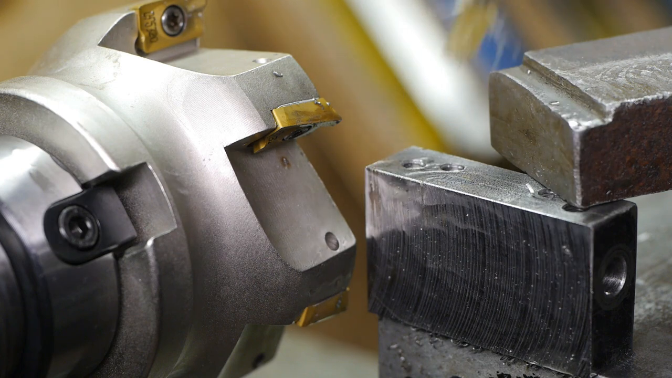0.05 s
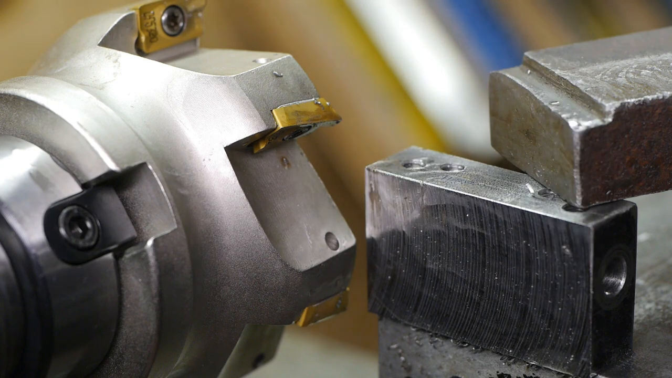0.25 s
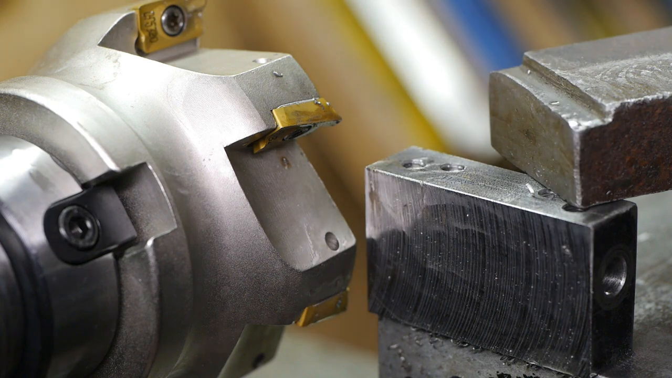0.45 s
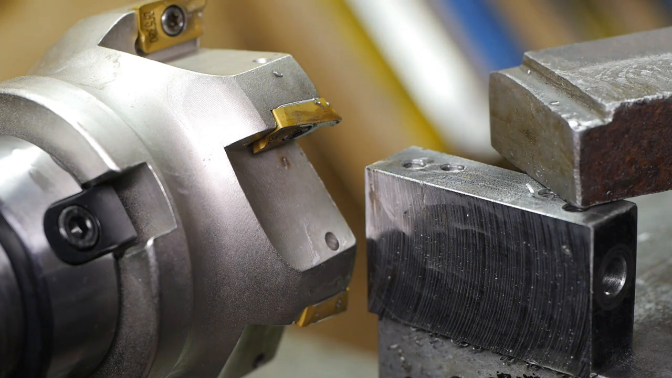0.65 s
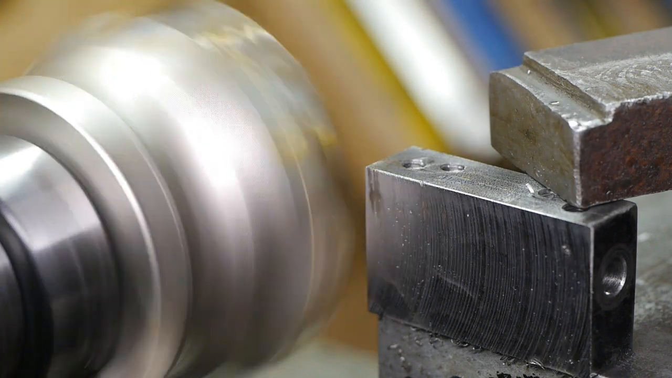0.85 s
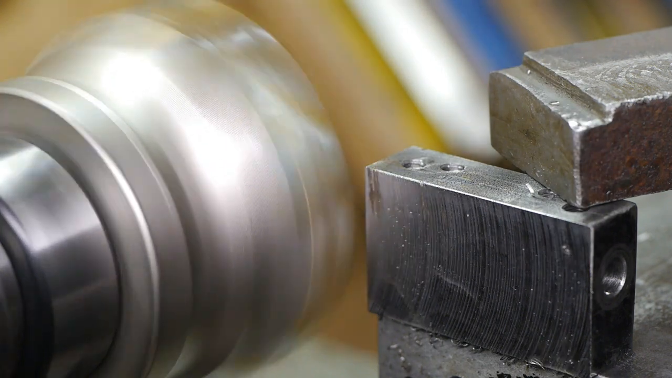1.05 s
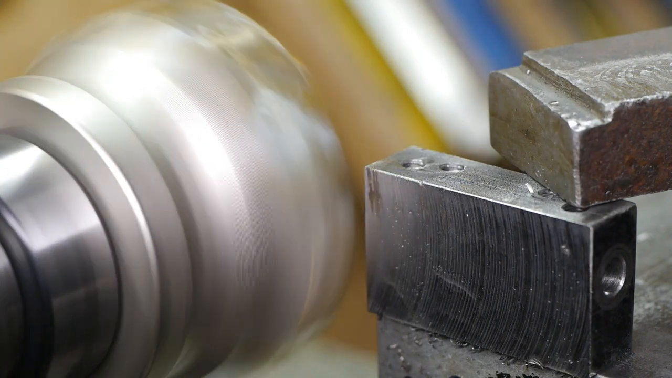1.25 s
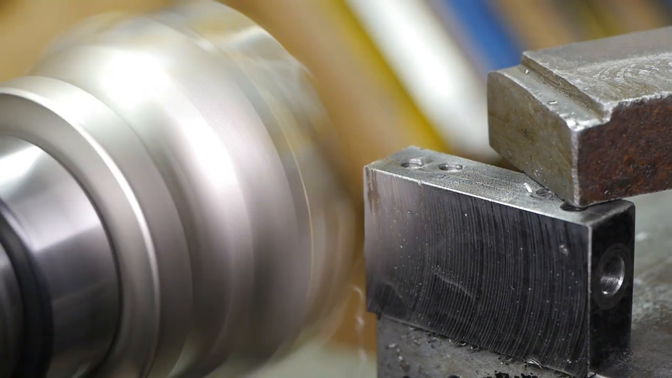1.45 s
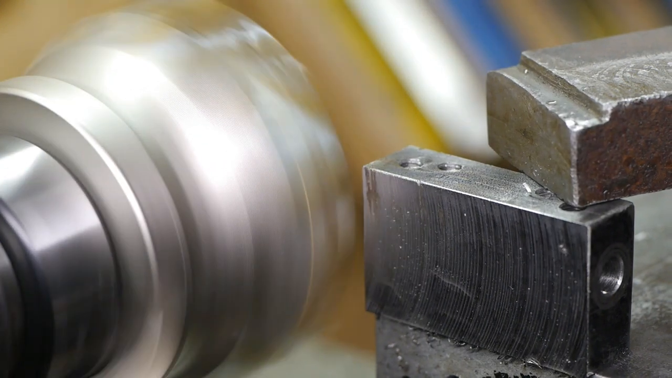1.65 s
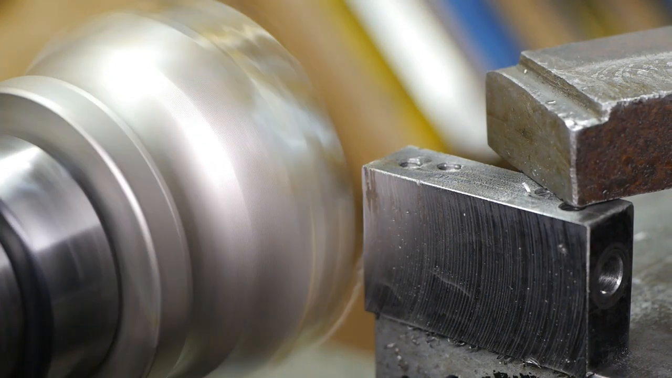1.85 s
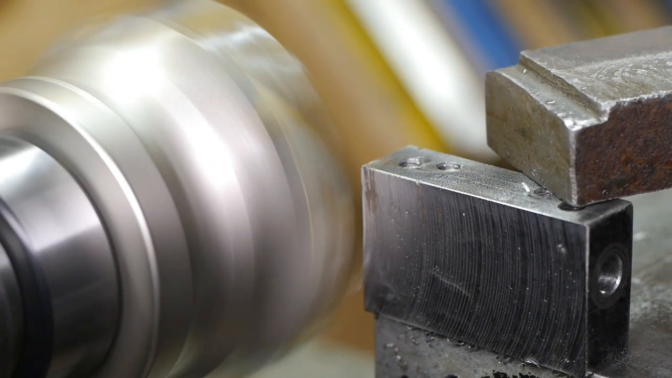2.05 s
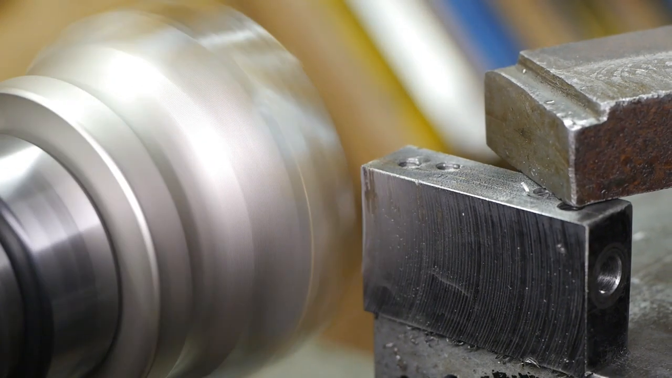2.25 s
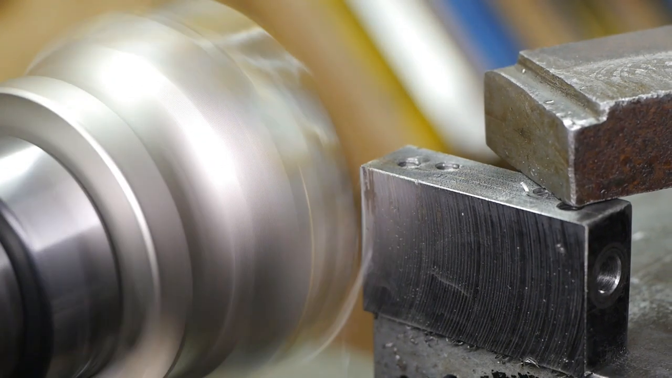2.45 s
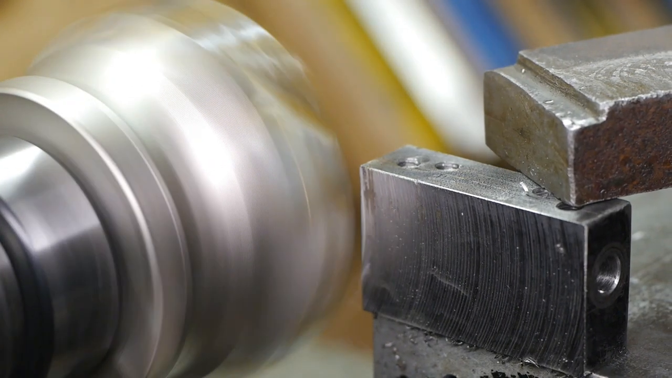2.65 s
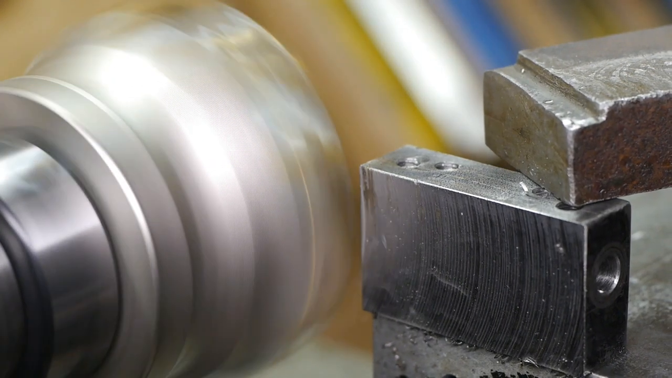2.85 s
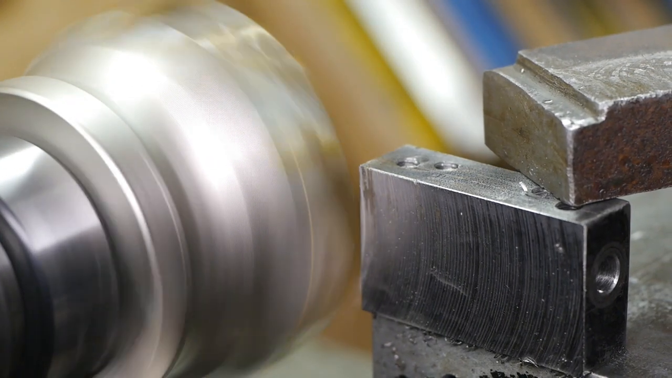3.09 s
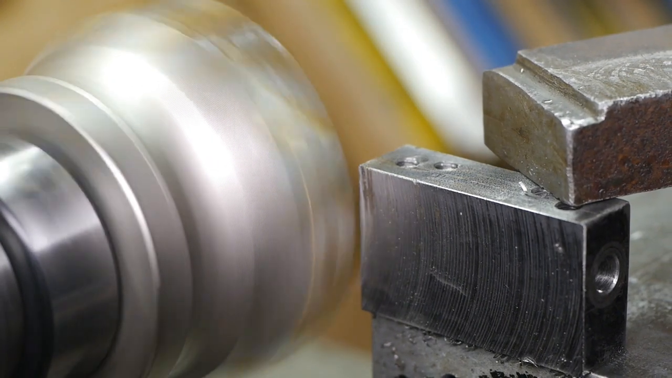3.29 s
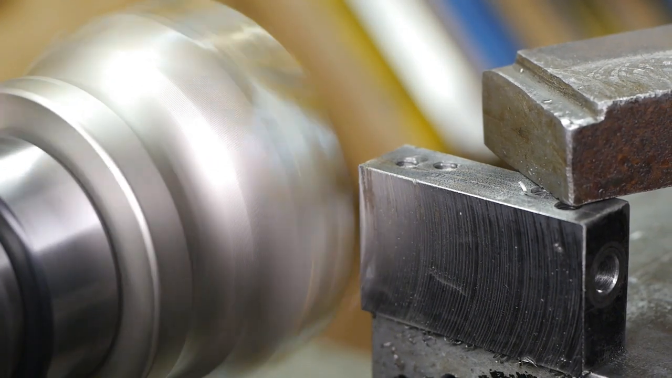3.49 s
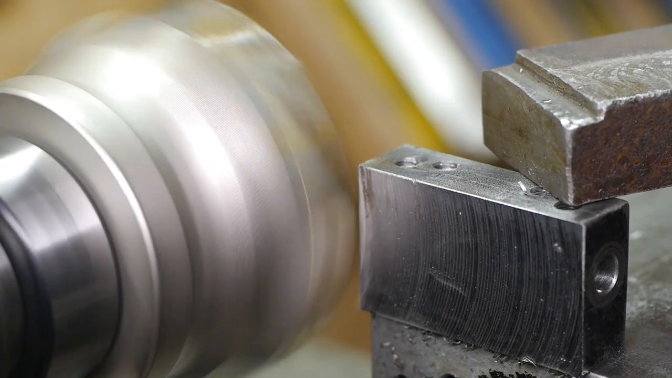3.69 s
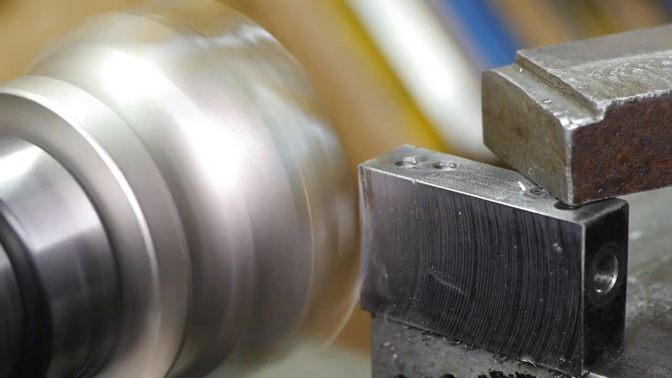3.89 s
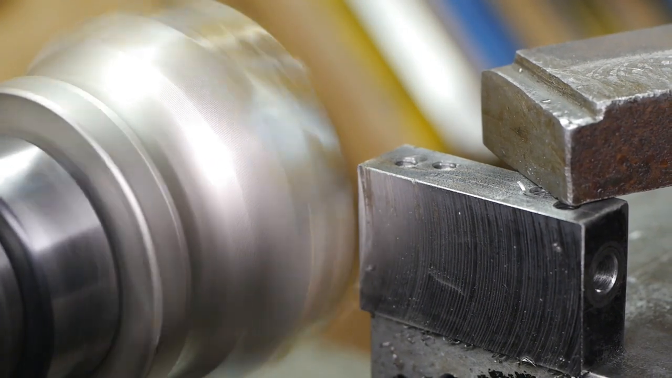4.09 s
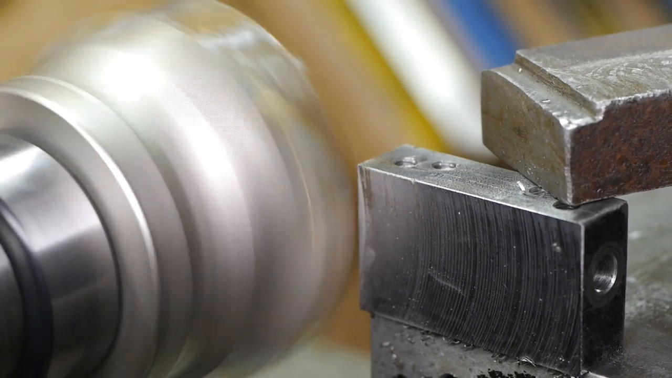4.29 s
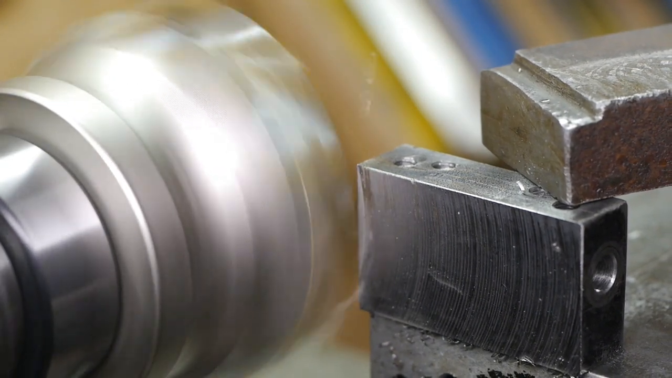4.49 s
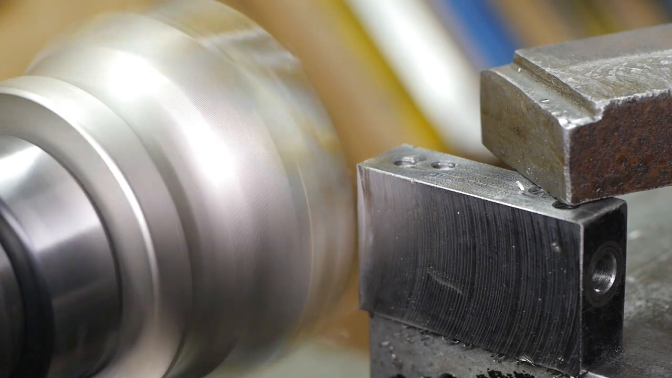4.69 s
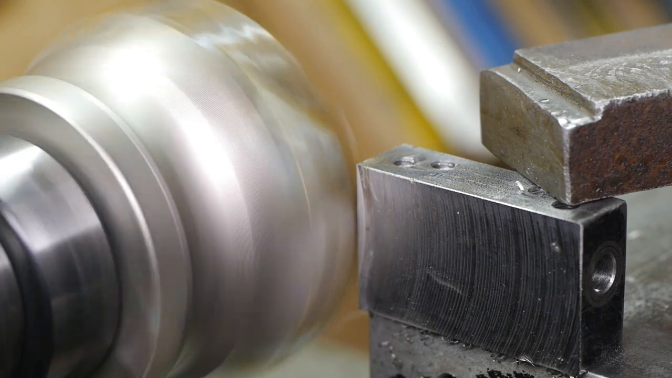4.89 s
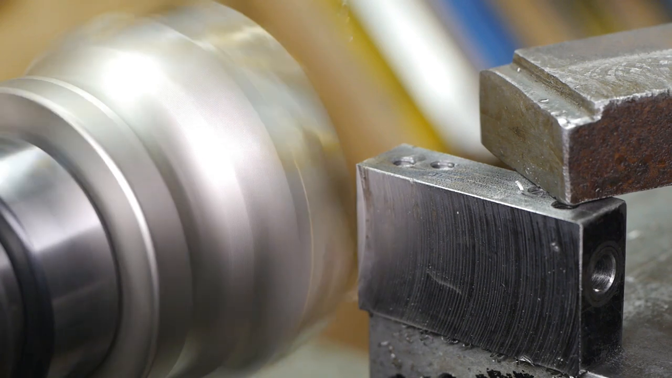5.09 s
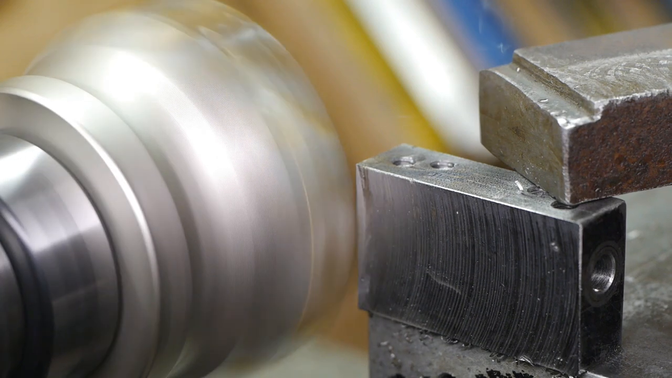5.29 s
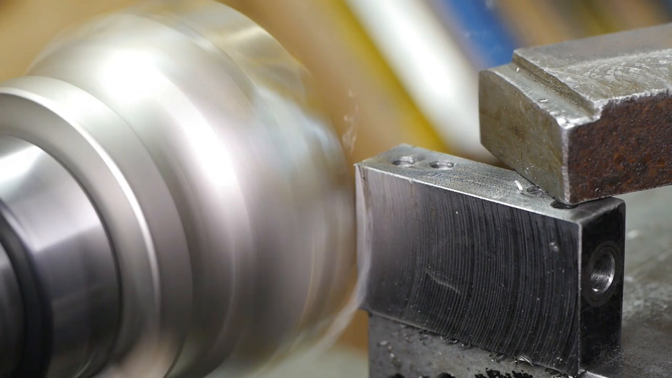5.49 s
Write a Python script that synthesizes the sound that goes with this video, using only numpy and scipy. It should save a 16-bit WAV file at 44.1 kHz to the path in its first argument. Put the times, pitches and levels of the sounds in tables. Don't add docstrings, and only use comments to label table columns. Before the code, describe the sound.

Quiet shop hum and a short brush stroke give way to a spinning milling cutter, whining electrically, thumping and chirping about seven times a second.

```python
import sys
import numpy as np
from scipy import signal
from scipy.fft import rfft, irfft, next_fast_len
from scipy.io import wavfile
from scipy.ndimage import uniform_filter1d, map_coordinates

SR = 44100
rng = np.random.default_rng(int(sys.argv[2]) if len(sys.argv) > 2 else 0)


def convert_level_to_amplitude(level_db):
    exponent = np.asarray(level_db, float) / 20
    return 10 ** exponent


def waveform_to_disk(signal):
    frames = np.transpose(np.atleast_2d(signal))
    scaled = np.clip(frames, -1, 1) * 32767
    samples = np.round(scaled).astype(np.int16)
    wavfile.write(sys.argv[1], SR, samples)


N = 243873

TURN_HZ = 6.917
SWITCH_HZ, TOOTH_HZ, SUPPLY_HZ = 1999.94, 224.745, 82.48
SLOT_HZ, ROTOR_HZ = 876.15, 13.6


def unit(x):
    return x / np.sqrt(np.mean(x ** 2) + 1e-20)


def along(points, hz):
    f, v = np.transpose(points)
    return np.interp(np.log(hz + 1), np.log(f + 1), v)


def curves(rows):
    s, *cols = np.transpose(rows)
    t = np.arange(N) / SR
    return [np.interp(t, s, c, left=-150, right=c[-1] if s[-1] > 5 else -150) for c in cols]


def wobble(rate):
    return map_coordinates(rng.standard_normal(int(N * rate / SR) + 4), [np.arange(N) * rate / SR])


def filtered(x, response):
    m = next_fast_len(N + SR // 2)
    return irfft(rfft(x, m) * response(np.fft.rfftfreq(m, 1 / SR)), m)[..., :N]


def ring(hz, width):
    return lambda f: 1j * f * width / (hz * hz - f * f + 1j * f * width)


def rush(spectrum, alike, patchy_db):
    z = signal.stft(rng.standard_normal((2, N)), nperseg=512)[2]
    field = uniform_filter1d(rng.standard_normal(z.shape[1:]), size=5, axis=0)
    field = uniform_filter1d(field, size=8, axis=1)
    pair = signal.istft(z * convert_level_to_amplitude(patchy_db * unit(field)), nperseg=512)[1][:, :N]
    turn = lambda hz: np.arccos(np.clip(along(alike, hz), -1, 1)) / 2
    mid, side = filtered(pair, lambda hz: convert_level_to_amplitude(along(spectrum, hz)) * [np.cos(turn(hz)), np.sin(turn(hz))])
    return unit(np.array([mid + side, mid - side]))


def place(db, pan_db, lag):
    share = 1 / (1 + convert_level_to_amplitude(-pan_db) ** 2)
    return convert_level_to_amplitude(db) * np.sqrt([[share], [1 - share]]) * np.exp(1j * lag / 2 * np.array([[-1], [1]]))


# centre in Hz, width in Hz, depth 0-1.
PATH_DIPS = [(2340, 120, 0.26), (3050, 110, .75), (3740, 110, 0.02), (5200, 200, 0.2), (5460, 160, 0.35),
             (9020, 580, 1), (11100, 400, 0.5), (12000, 300, .35)]


def path(f):
    return np.prod([1 - np.clip(depth, 0, 1) * ring(hz, width)(f) for hz, width, depth in PATH_DIPS], axis=0)


# time in seconds, rustle level in dB.
STIR = [
    (0, -67.5),
    (.25, -62),
    (.37, -57),
    (.46, -57.5),
    (.52, -53.5),
    (.6, -59.5),
    (.7, -59),
    (.905, -67),
    (.912, -72),
]
# pitch in Hz, level in dB rms.
HUM_LINES = [(92.2, -66.5), (100.3, -72), (46.4, -74)]
# frequency in Hz, level in dB per Hz.
HUM = [(20, -27), (45, -16), (84, -18), (96, -12), (108, -12), (140, -14), (190, -56)]
RUSTLE = [(120, -38), (200, -8.5), (255, -5.5), (300, -1), (360, -6), (450, -4.5), (560, -9.5),
          (800, -10.5), (1000, -15), (1090, -6.5), (1200, -19), (1500, -17), (2500, -48)]
STILL_AIR = [(700, -11), (1200, -4.5), (2000, -6.5), (5000, -11), (9000, -12), (13000, -17.5), (14500, -24),
             (15700, -15)]
# frequency in Hz, left-right likeness.
SHOP_ALIKE = [(60, 0.75), (180, 0.96), (550, 0.55), (1650, -0.72), (4970, 0.067), (15000, 0.25)]


def shop():
    stir_db, = curves(STIR)
    on = stir_db > -100
    hum = on * convert_level_to_amplitude(-69 + .6 * wobble(7.4)) * rush(HUM, SHOP_ALIKE, patchy_db=3.0)
    beat = 2 * np.pi * (np.arange(N) / SR - 0.32)
    for hz, db in HUM_LINES:
        hum = hum + on * np.sqrt(2) * convert_level_to_amplitude(db + 1.2 * wobble(6)) * np.sin(hz * beat)
    rustle = convert_level_to_amplitude(stir_db + 0.52 * wobble(23.0)) * rush(RUSTLE, SHOP_ALIKE, patchy_db=1.5)
    air_db = -60 + .35 * (stir_db + 59.5)
    return hum + rustle + on * convert_level_to_amplitude(air_db) * rush(STILL_AIR, SHOP_ALIKE, patchy_db=0.5)


# time of the peak in seconds, peak in dB, rise and fall in seconds,
# centre in Hz.
STROKES = [
    (0.049, -43.5, 0.018, .01, 10500),
    (.502, -57, .003, 0.027, 5100),
    (.529, -44.5, .0008, 0.036, 5300),
    (.544, -40.5, 0.012, .015, 6400),
    (.3725, -50, .0004, .008, 730),
    (.04, -62, 0.024, 0.018, 2600),
]
KNOCKS = [
    (.528, -46.5, 0.0016, 0.036, 2600),
    (.55, -50, 0.012, .02, 140),
    (.525, -52, .005, .017, 950),
    (.3728, -48, .0003, .0022, 860),
]
# pitch in Hz, width in Hz, level in dB.
HANDLE = [(2135, 44, -4), (2700, 150, -6), (3280, 72, -8), (3610, 40, -10), (4020, 46, -4), (4950, 56, -8),
          (5400, 82, -12), (5800, 61, -10), (6910, 46, -15), (7500, 49, -9)]
# start in seconds, level in dB.
TICKS = [
    (.4995, -60),
    (.5038, -64),
    (.5275, -49),
    (.534, -54),
    (.541, -53),
    (.5455, -52),
    (.551, -56),
    (.556, -60),
]
# pitch in Hz, level in dB, 60 dB decay in seconds.
FERRULE = [(2137, -9, .25), (2740, -2, .12), (3311, -7, 0.15), (3640, -7, .12), (4150, -4.5, .12),
           (5066, -4, .1), (5421, -8, .1), (5862, -6, .08), (6751, -8, .08), (7350, -4, .08)]


def brush():
    t, out = np.arange(SR) / SR, np.zeros((2, N))
    puffs = [(*row, 1) for row in STROKES] + [(*row, 0.53) for row in KNOCKS]
    for s, db, rise, fall, hz, octaves in puffs:
        swell = np.exp(np.minimum((t - s) / abs(rise), (s - t) / abs(fall)))
        bristles = rng.standard_normal((3, SR)) * convert_level_to_amplitude(1.3 * wobble(600)[:SR])
        colour = np.exp(-(np.log2((np.fft.rfftfreq(SR, 1 / SR) + 1) / hz) / octaves) ** 2)
        grain = unit(irfft(rfft(bristles[0] + 0.5 * bristles[1:]) * colour, SR))
        out[:, :SR] += convert_level_to_amplitude(db - 3.0) * swell * grain
    body = lambda f: 1 + 3.5 * sum(convert_level_to_amplitude(db) * ring(hz, .7 * width)(f) for hz, width, db in HANDLE)
    out, t = filtered(out, body), t[:SR // 4]
    for s, db in TICKS:
        bell = 0
        for hz, level, t60 in FERRULE:
            a, b = rng.standard_normal(2)
            bell = bell + convert_level_to_amplitude(level + 3.9 * a - 60 * t / t60) * np.sin(2 * np.pi * hz * (1 + .004 * b) * t)
        out[:, round(s * SR):][:, :len(t)] += convert_level_to_amplitude(db) * bell
    return out


# switching multiple, tooth multiple, level in dB rms, left minus right in dB,
# left lag in radians.
TONES = [(0, 2, -51.0, -1.0, -0.1), (0, 5, -25.0, 4.0, -0.8), (1, -3, -51.0, 4.0, -0.6),
         (1, -2, -52.0, 9.0, 0.1), (0, 7, -48.0, 3.0, -0.1), (1, 0, -40.0, 9.0, -0.6),
         (2, -7, -57.0, 8.0, 0.6), (1, 2, -43.0, 14.0, 0.1), (0, 12, -47.0, 3.0, 0.0),
         (2, -5, -52.0, -2.0, -0.9), (1, 5, -48.0, 1.0, -0.5), (3, -12, -54.0, 7.0, 0.3),
         (2, -3, -50.0, 3.0, 0.5), (2, -2, -51.0, -2.0, -0.0), (1, 7, -52.0, 5.0, -0.0),
         (2, 0, -41.0, 0.0, 0.4), (3, -7, -52.0, 5.0, -0.6), (2, 2, -37.0, 1.0, 0.4),
         (1, 12, -50.0, -7.0, -0.7), (3, -5, -52.0, 8.0, -0.7), (3, -3, -51.0, 12.0, 0.5),
         (2, 8, -55.0, 8.0, 0.3), (3, 2, -54.0, -1.0, -0.1), (2, 15, -59.0, -1.0, 0.1)]
# switching, tooth and supply multiples, level in dB rms,
# left minus right in dB.
BEATS = [(1, -5, -1, -55.0, 1.0), (1, -5, 1, -49.0, 0.0), (0, 4, 1, -48.0, 2.0), (0, 5, -1, -56.0, -4.0),
         (0, 5, 1, -42.0, 4.0), (0, 5, 2, -57.0, 1.0), (0, 6, 1, -54.0, -2.0), (1, -2, -1, -46.0, 0.0),
         (0, 7, -1, -53.0, 0.0), (1, 0, -1, -58.0, 11.0), (1, 0, 1, -60.0, 8.0), (1, 2, 1, -57.0, 7.0),
         (1, 7, 1, -52.0, 3.0), (2, 0, -3, -57.0, -4.0), (2, 0, 1, -60.0, 2.0), (2, 2, 1, -59.0, 5.0),
         (1, 12, 1, -49.0, 3.0), (3, -3, 1, -59.0, -1.0), (3, 12, 3, -61.0, 4.0), (3, 15, 1, -60.0, 9.0),
         (6, -10, -2, -55.0, 7.0), (3, 15, 3, -60.0, 5.0), (4, 10, 3, -60.0, -1.0), (4, 15, 3, -60.0, -5.0)]
# rotor turns off the line, level in dB rms.
WHINE = [(-2, -49), (-1, -46), (.5, -57), (1, -47)]
# pitch in Hz, level in dB rms, left minus right in dB, left
STRAY = [(435.4, -56, 0, -.1), (505.4, -50, 0, -.1), (532, -57, 0, 0), (674.2, -56, -1, 0),
         (4612.8, -57, -3, .4), (4860.4, -49, 6, .3), (8201.8, -57, 2, .1), (9422.1, -62, 12, -.7),
         (9669.6, -60, 7, -.6), (10577, -61, 1, -.6), (11535.7, -62, -3, -1.2), (2026.8, -56, 6, -.5),
         (2247.5, -63, 3, 0), (3108.9, -58, 0, -.5), (3407.6, -59, 3, .3), (3466.8, -59, -1, 0),
         (4164, -59, 3, 0), (4285.1, -58, 1, .3), (4793.8, -57, 0, -.5), (5371.9, -70, 3, 0),
         (6629.5, -67, 1, 0), (6920.2, -61, 3, 0), (7326.7, -60, 1, 0), (8494.8, -61, -1, 0),
         (8629.4, -63, -1, 0), (9797.6, -69, -3, 0), (10045.2, -62, -5, -.4), (11423.4, -64, -2, -1)]
TEETH = (0, 2, 3, 5, 7, 8, 10, 12, 15)
# frequency in Hz, level in dB rms.
FAINT = [(1000, -54), (2500, -66.5), (4000, -66), (7500, -68.5), (12000, -70)]
# frequency in Hz, left lag in radians.
LAG = [(1000, -0.39), (1500, -0.6), (2200, 1), (5000, .2), (9500, -0.53), (11600, -1.6)]
# frequency in Hz, left minus right in dB.
LEAN = [(900, -1), (1200, 4.5), (2500, 7), (4000, 1), (6000, 1), (11000, 0.8), (11700, -0.6), (14000, 2.5)]


def line_families():
    at = lambda a, b, c=0: a * SWITCH_HZ + b * TOOTH_HZ + c * SUPPLY_HZ
    strong = [(at(a, b), db, pan_db, lag) for a, b, db, pan_db, lag in TONES] + STRAY
    strong += [(at(a, b, c), db, pan_db, along(LAG, at(a, b, c))) for a, b, c, db, pan_db in BEATS]
    strong += [(5 * TOOTH_HZ + turns * ROTOR_HZ, db, 5, -.7) for turns, db in WHINE]
    sums = [(at(a, way * b, c), c)
            for a in range(1, 6) for b in TEETH for way in {1, -1 if b else 1} for c in (0, 1)]
    taken = np.array([SLOT_HZ] + [line[0] for line in strong])
    faint = []
    for hz, c in sums:
        z = rng.standard_normal(3)
        if 1300 < hz < 12500 and min(abs(taken - hz)) > 2:
            db = along(FAINT, hz) - 5.5 * c + 5 * z[0]
            faint.append((hz, db, along(LEAN, hz) + 3 * z[1], along(LAG, hz) + 0.54 * z[2]))
    return strong, faint


def motor(lines, drift, shake):
    m, band = 6 * SR, 1800
    t, out = np.arange(band) / band * m / SR, np.zeros((2, m // 2 + 1), complex)
    knots = lambda rate: np.interp(t * rate, np.arange(6 * rate + 1), rng.standard_normal(6 * rate + 1))
    for hz, db, pan_db, lag in lines:
        slip = 2 * np.pi * rng.random() + drift * knots(3) + shake * knots(90)
        spread = np.fft.fftshift(np.fft.fft(np.exp(1j * slip))) * m / band
        out[:, round(hz * m / SR) - band // 2:][:, :band] += place(db, pan_db, lag) * spread
    return irfft(out, m)[:, :N]


# rotor turns off the tone, level in dB rms, left minus right in dB,
# left lag in radians.
SLOT = [(-2, -54, -2, -.3), (-1, -45, -2, -.6), (0, -39, -9, -.6), (1, -43, -6, -1)]


def slot_tone():
    t, slip = np.arange(N) / SR, 0.46 * wobble(2.83) + 0.17 * wobble(60)
    out = 0
    for order, db, pan_db, lag in SLOT:
        phase = 2 * np.pi * ((SLOT_HZ + order * ROTOR_HZ) * t + abs(order) / 6)
        phase = phase + slip + 0.96 * wobble(1.85) * abs(order)
        out = out + 2 * np.imag(place(db, pan_db, lag) * np.exp(1j * phase))
    return out


# frequency in Hz, level in dB per Hz.
CASING = [(130, -30), (250, -12), (380, -5), (500, -5.5), (560, 0), (620, -10), (690, -2.5), (780, -13.5),
          (875, -2), (1040, -8.5), (1120, -4.5), (1280, -12), (1460, -4.5), (1620, -12.5)]
HISS = [(1400, -17), (1750, -7), (1950, -3), (2200, -5), (2800, -1.5), (3020, 2.5), (3300, 0.5), (4500, 0),
        (5200, 0), (6100, -2), (8200, 0), (9600, -1), (11600, -4.5), (14000, -18), (15600, -21)]
RUMBLE = [(15, -30), (35, -33), (52, -10.5), (75, -15), (105, 2.5), (135, -14.5), (190, -2.5), (280, -5),
          (400, -48)]
# frequency in Hz, left-right likeness.
MACHINE_ALIKE = [(60, 0.86), (300, 0.88), (900, 0.89), (2300, 0.49), (3500, 0.6), (6200, 0.5), (10000, 0.8),
                 (12000, 0.11), (15000, .05)]


def casing_and_hiss(casing_db, hiss_db):
    turn = 2 * np.pi * TURN_HZ * np.arange(N) / SR
    throb = 4.1 * np.cos(turn - 1.5) + 0.66 * wobble(30)
    casing_shape = CASING + [(1800, -21.5), (3000, -89)]
    casing = convert_level_to_amplitude(casing_db + 0.45 + throb) * rush(casing_shape, MACHINE_ALIKE, patchy_db=0.6)
    flutter = 1.15 * np.cos(2 * turn + 0.68) + .5 * wobble(17.0) + 1.0 * wobble(500)
    hiss = convert_level_to_amplitude(hiss_db + 4.5 + flutter) * rush([(600, -90)] + HISS, MACHINE_ALIKE, patchy_db=1.1)
    noise = filtered(casing + hiss, lambda hz: convert_level_to_amplitude(along(LEAN, hz) / 2 * np.array([[1], [-1]])))
    ripple_hz = 60
    ripple = rng.standard_normal(SR // ripple_hz)
    ripple_db = lambda hz: 1.7 * (hz > 1700) * map_coordinates(ripple, [hz / ripple_hz])
    return filtered(noise, lambda hz: path(hz) * convert_level_to_amplitude(ripple_db(hz)))


# place in the turn 0-1, ringing in Hz, width in Hz,
# level in dB.
SLIDE = [(0.99, 288.5, 22.6, -3), (0.95, 173, 20, -3), (.165, 183.4, 24.5, 2), (.5, 191, 30, -7),
         (.86, 282, 31, -8), (0.4, 112, 27, -15), (.05, 186, 30, -5), (.65, 177, 22, -13),
         (.07, 301, 32, -9)]
VICE = [(.93, 462, 34, 0.5), (0.1, 485.5, 25, 2), (.27, 550, 13.4, -1.5), (0.44, 480, 33, -4),
        (0.464, 750, 35, -4), (0.93, 690, 37, -5), (0.0287, 630, 13, -5.5), (0.5, 500, 65, -1.5)]


def blows(table, jitter_s, scatter_db):
    turns, out = np.arange(6, int(N / SR * TURN_HZ)), np.zeros(N)
    for spot, hz, width, db in table:
        chance, push = rng.standard_normal((len(turns), 2)), np.zeros(N + SR)
        hits = (turns + spot) / TURN_HZ * SR + jitter_s * SR * chance[:, 0]
        push[hits.astype(int)] = convert_level_to_amplitude(scatter_db * chance[:, 1])
        once = ring(hz, 1.72 * width)
        out += convert_level_to_amplitude(db) * unit(filtered(push[:N], lambda f: once(f) ** 2))
    return unit(out)


# start in seconds, peak in dB, low knock in dB, pitch in Hz.
CHIRPS = [(2.3689, -28, -45, 6115), (2.5131, -28, -50, 6150), (2.657, -18, -29, 6150),
          (2.801, -18.5, -41, 6140), (2.9481, -21, -36, 6080), (3.092, -19.5, -48, 6100),
          (3.237, -19.5, -27, 6185), (3.382, -21, -41, 6090), (3.527, -22.5, -41, 6140),
          (3.673, -23, -32, 6000), (3.816, -24.5, -21, 5910), (3.9538, -23, -23, 5850),
          (4.1, -22.5, -22, 6110), (4.248, -24, -36, 6130), (4.389, -25.5, -38, 6090),
          (4.5355, -24.5, -26, 6130), (4.6823, -28, -22, 6000), (4.8209, -29, -22, 6170),
          (4.967, -25, -23, 5860), (5.1125, -26.5, -41, 6045), (5.254, -27, -42, 5870),
          (5.4025, -27.5, -25, 6115)]
# turns behind the proud one, level in dB, pitch in Hz, drag in seconds,
# knock in dB.
GRAZERS = [
    (.5, -33.5, 6300, 0.0058, -31),
    (.64, -36, 6410, 0.0099, -36),
    (.72, -42, 5900, .007, -47),
]


def chirps():
    t, out = np.arange(SR // 12) / SR, np.zeros((2, N + SR))
    widening = lambda s: max(s - 3.3, 0)
    touches = [(s, db, hz, .0027 + .0028 * widening(s), knock_db) for s, db, knock_db, hz in CHIRPS]
    for s, *_ in CHIRPS:
        for behind, db, hz, drag, knock_db in GRAZERS:
            a, b, c = rng.standard_normal(3)
            touches.append((s + behind / TURN_HZ, db + 1.5 * a, hz + 90 * b, drag, knock_db + 2.5 * c))
    for s, db, hz, drag, knock_db in touches:
        wide = widening(s)
        wander = np.cumsum(rng.standard_normal((2, len(t))), axis=1) / np.sqrt(SR / 300)
        wander = (1.0 + .8 * wide) * wander
        note = np.sin(2 * np.pi * hz * t + wander[0])
        note = note + 0.35 * np.sin(2 * np.pi * (12000 - hz) * t + wander[1])
        bite = np.exp(-((t - .0018 - drag) / drag) ** 2)
        flutter = 1 + .7 * np.sin(2 * np.pi * (110 * t + rng.random()))
        after = .33 * np.exp(-t / .025) * (t > .008) * flutter
        crackle = np.convolve(rng.standard_normal(len(t)), [0.24, 0.22, -0.41, -.5], "same")
        slip = 0.18 * np.exp(-abs(t - .004) / 0.00056) * crackle
        scrape = np.cumsum(rng.standard_normal(len(t))) / 5.3
        note = note + min(0.8 * wide, 1.4) * np.sin(2 * np.pi * 5950 * t + scrape)
        u = t / 0.0067
        holder = np.sin(2 * np.pi * rng.choice([1690, 1910]) * t + 0.68 * wander[0])
        knock = convert_level_to_amplitude(knock_db - 12.5) * u * np.exp(1 - u) * holder
        chirp = convert_level_to_amplitude(db - 5.5 - 2.1 * wide) * ((bite + after) * note + slip) + knock
        out[:, round((s - .002) * SR):][:, :len(t)] += chirp * convert_level_to_amplitude([[.6], [-.6]])
    return out[:, :N]


# time in seconds, motor level in dB.
FADE = [(.9, -75), (.912, -60.5), (.96, -59), (.968, -52.5), (1.04, -49.5), (1.05, -47.5), (1.105, -48),
        (1.115, -44.5), (1.33, -39), (1.57, -35), (1.9, -32.5), (2.3, -29), (3.5, -28.5), (5.53, -29.5)]
# time in seconds, level relative to the motor in dB.
BITE = [
    (.9, -35),
    (1.33, -38),
    (1.57, -20.5),
    (2.3, -12.5),
    (2.7, -18),
    (3.5, -13.5),
    (4.3, -13),
    (4.7, -16),
    (5.53, -14.5),
]


def machine():
    (motor_db,), (bite_db,) = curves(FADE), curves(BITE)
    widening_s = np.clip(np.arange(N) / SR, 1.1, 4.52) - 1.1
    blow_db, hiss_db = motor_db + bite_db, motor_db - 12.5
    casing_db = motor_db - 19 + 3 * widening_s
    named, others = line_families()
    frame = [line for line in named if line[0] < 3200]
    winding = [line for line in named if line[0] >= 3200]
    whine = convert_level_to_amplitude(0.1) * motor(frame, drift=0.071, shake=0.095)
    whine = whine + convert_level_to_amplitude(-0.05) * motor(winding, drift=0.14, shake=0.075)
    whine = whine + filtered(motor(others, drift=0.17, shake=0.21), path) + convert_level_to_amplitude(0.1) * slot_tone()
    noise = casing_and_hiss(casing_db, hiss_db)
    rumble_db = hiss_db - 8.5 + 0.12 * (bite_db + 16.5)
    rumble = convert_level_to_amplitude(rumble_db) * rush(RUMBLE, MACHINE_ALIKE, patchy_db=-1.5)
    slide = convert_level_to_amplitude(blow_db + 1.0) * blows(SLIDE, jitter_s=0.00032, scatter_db=0.5)
    slide = slide * convert_level_to_amplitude(0.67 * np.array([wobble(22.94), wobble(18)]))
    vice = convert_level_to_amplitude(.5 * (casing_db + blow_db) - 2.0) * blows(VICE, jitter_s=0.00045, scatter_db=0.0)
    return convert_level_to_amplitude(motor_db + 29.0) * whine + noise + rumble + slide + vice + chirps()


def scene():
    return filtered(shop() + brush(), path) + machine()


def band_limit(x):
    return signal.sosfilt(signal.butter(12, 15660, fs=SR, output="sos"), x)


def record(dry):
    return band_limit(dry)


dry = scene()
out = record(dry)
waveform_to_disk(out)
```